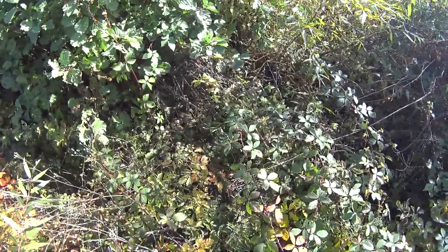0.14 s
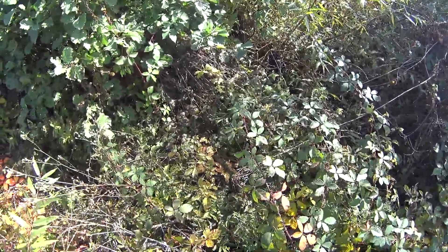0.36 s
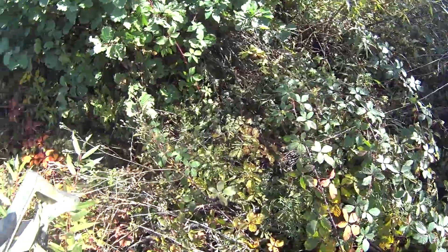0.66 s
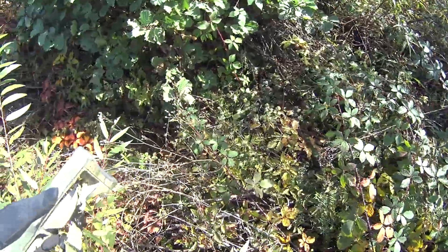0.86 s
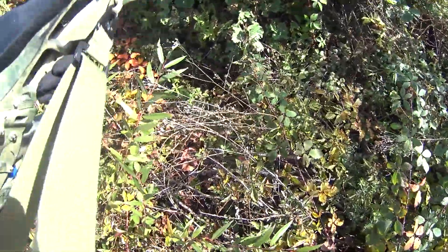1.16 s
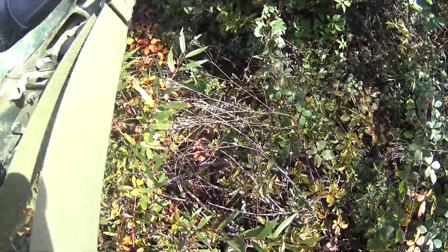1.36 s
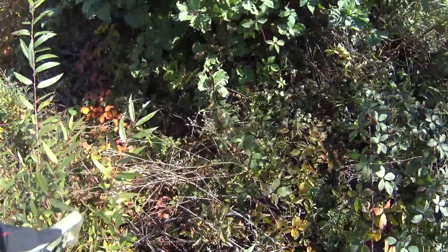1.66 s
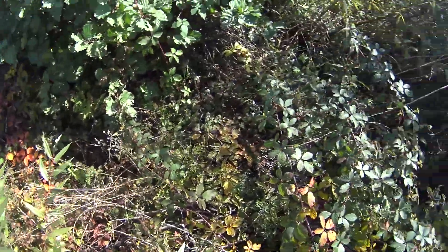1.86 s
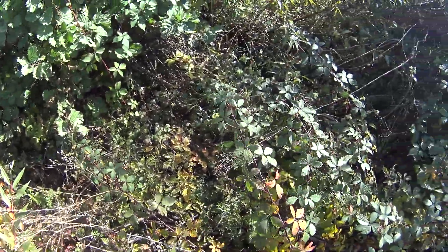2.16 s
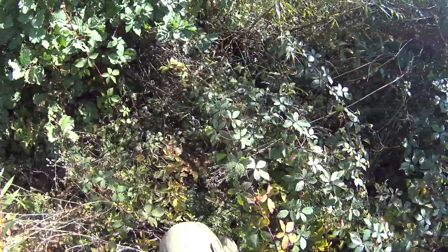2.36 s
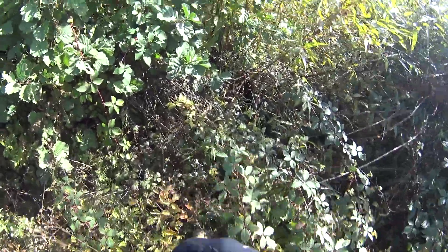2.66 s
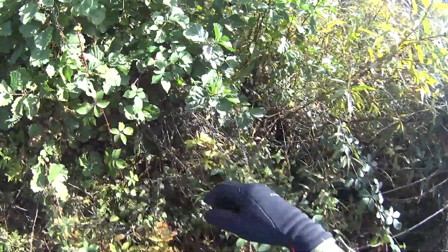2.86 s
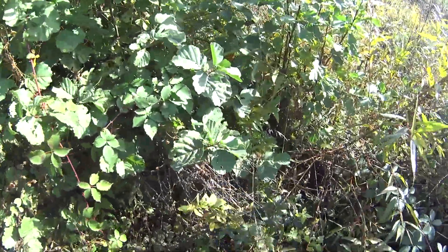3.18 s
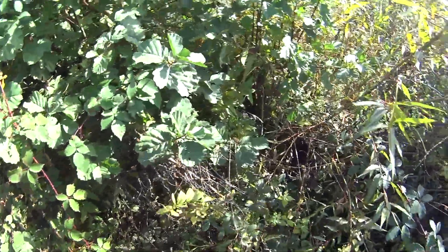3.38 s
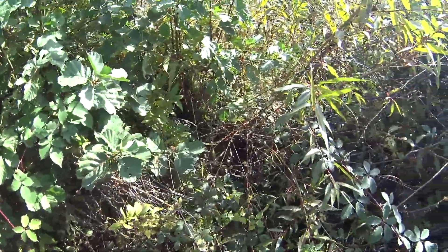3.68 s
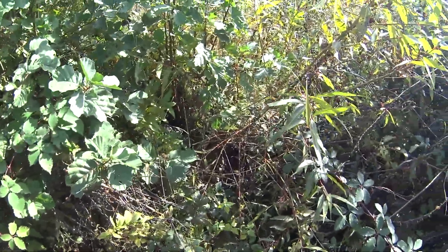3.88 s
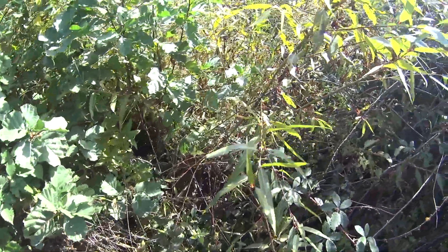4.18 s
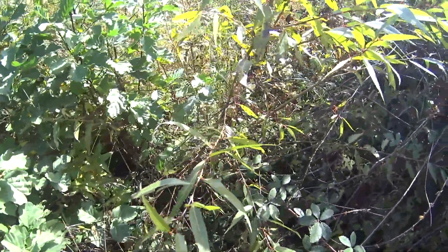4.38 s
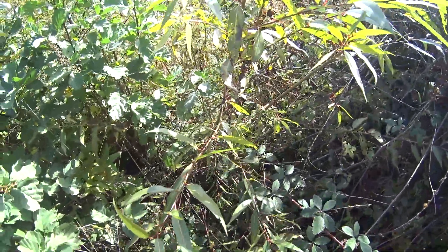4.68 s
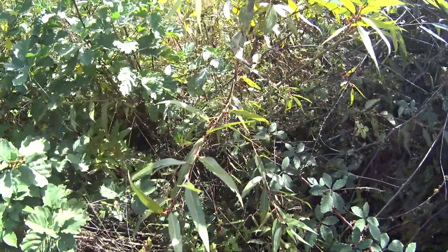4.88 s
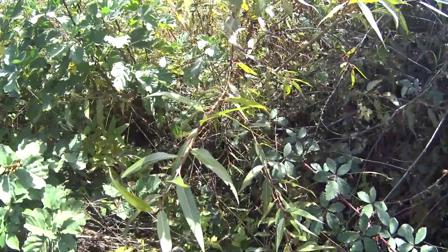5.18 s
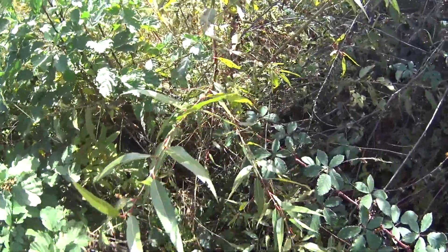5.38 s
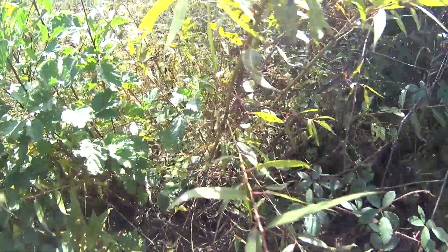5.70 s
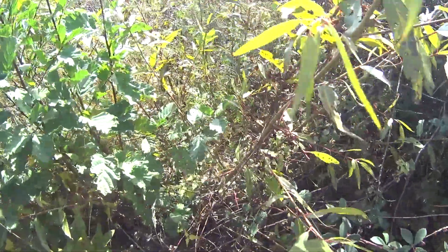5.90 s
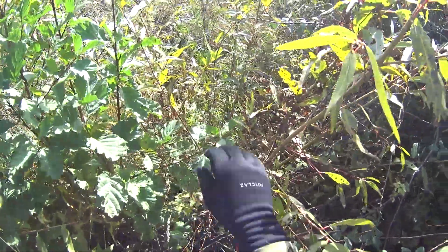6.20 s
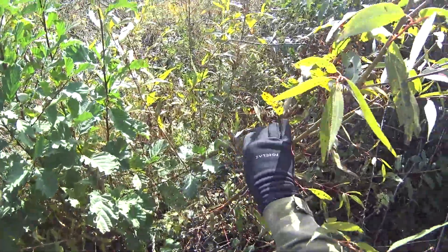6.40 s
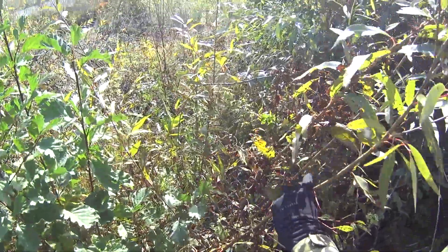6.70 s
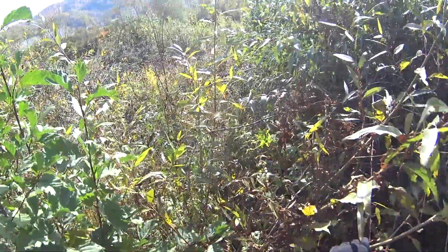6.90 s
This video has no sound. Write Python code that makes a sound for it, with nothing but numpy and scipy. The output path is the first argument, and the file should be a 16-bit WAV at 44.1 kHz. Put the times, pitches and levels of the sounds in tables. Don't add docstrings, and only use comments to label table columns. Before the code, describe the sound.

Someone pushes through dense dry brush; leaves flick and rustle close to the microphone, twigs knock its hard casing, and a low hum swells with jolts.

```python
import sys
import numpy as np
from scipy import signal
from scipy.fft import rfft, irfft, next_fast_len
from scipy.io import wavfile
from scipy.ndimage import uniform_filter1d, map_coordinates

SR = 44100
rng = np.random.default_rng(int(sys.argv[2]) if len(sys.argv) > 2 else 0)


def invert_db(level):
    return 10 ** (np.asarray(level, dtype=float) / 20)


def int16_out(signal):
    q = np.round(np.clip(np.atleast_2d(signal).T, -1, 1) * 32767)
    wavfile.write(sys.argv[1], SR, q.astype(np.int16))


N = 310905


def unit(x):
    return x / np.sqrt(np.mean(x ** 2) + 1e-20)


def along(points, hz):
    f, v = np.transpose(points)
    return np.interp(np.log(hz + 1), np.log(f + 1), v)


def curves(rows):
    s, *columns = np.transpose(rows)
    return [np.interp(np.arange(N) / SR, s, column) for column in columns]


def filtered(x, response):
    size = next_fast_len(x.shape[-1] + 8192)
    spectrum = rfft(x, size) * response(np.fft.rfftfreq(size, 1 / SR))
    return irfft(spectrum, size)[..., :x.shape[-1]]


def hiss(spectrum):
    return unit(filtered(rng.standard_normal(N), lambda hz: invert_db(along(spectrum, hz))))


def contacts(count, spread_db, t60, bed):
    where, size = rng.random((count, 2)).T
    touches = invert_db(-2 * spread_db * np.log(1 - size * .97))
    power = np.bincount((where * N).astype(int), touches, N)
    power = signal.lfilter([1], [1, -invert_db(-120 / (t60 * SR))], power)
    return unit(np.sqrt(power / power.mean() + bed))


def swells(rows, bed_db):
    t = np.arange(0, N, 64) / SR
    peaks = 0
    for s, db, rise, fall in rows:
        distance = np.maximum((s - t) / abs(rise), (t - s) / abs(fall))
        peaks = peaks + invert_db(2 * db - 51.0 * distance)
    return np.sqrt(np.interp(np.arange(N) / SR, t, peaks) + invert_db(2 * bed_db))


# start in seconds, peak in dB, centre in Hz, thin edge in dB.
STEMS = [(0.175, -26, 4600, -35), (0.196, -22, 2590, -38), (0.7795, -21.5, 3560, -37),
         (0.935, -23.5, 2650, -45), (1.046, -21, 2670, -39.5), (1.053, -6.5, 3750, -15),
         (1.7436, -21.5, 3000, -47), (2.6613, -14.5, 3760, 4), (3.557, -21.5, 2850, -42),
         (3.5819, -19, 4750, -43), (4.618, -14.5, 2600, -18), (5.0024, -15.5, 3670, -20),
         (5.7574, -11, 3600, -27), (6.356, -19.5, 2540, -30), (6.46, -6, 2450, -11),
         (6.866, -15, 2860, -32), (4.12, -27, 4000, -40), (0.117, -28.5, 2700, -40), (5.279, -12, 5000, -6)]
# start in seconds, peak in dB, centre in Hz, thin edge in dB.
LEAVES = [(1.006, -26, 7090, -20), (1.488, -5.5, 5200, -30), (2.05, -24, 6070, -27),
          (2.7972, -5.5, 6460, -12), (2.8277, -3, 4440, -26), (3.6657, -22, 5990, -26),
          (3.6773, -11, 5000, -59), (3.7131, -9.5, 5700, -42), (3.8562, -23.5, 5950, -20),
          (3.8677, -22, 5530, -14), (3.978, -22, 4990, -15), (3.989, -17, 6050, -33),
          (4.657, -12.5, 6000, -32), (4.6768, -16, 8320, -26), (5.0431, -13.5, 6010, -21),
          (0.796, -29, 5600, -40), (6.322, -17, 6070, -10), (6.411, -16, 7500, -18),
          (6.712, -23, 6060, -34), (6.734, -20.5, 5980, -38), (6.8267, -18, 5700, -36),
          (6.9098, -12.5, 6000, -5), (6.9508, -18, 5950, -26), (6.417, -17, 7000, -10),
          (6.487, -17.5, 7000, -20), (6.594, -22, 6500, -20), (4.81, -23, 8000, -12),
          (4.83, -24, 8000, -14), (5.022, -15, 6000, -27), (5.09, -18, 4800, -30), (5.157, -25, 4500, -25),
          (0.622, -32, 6000, -23), (0.255, -31, 6500, -20)]
# start in seconds, peak in dB, thin edge in dB, rattle t60 in seconds.
WHIPS = [(2.8745, -9, -17, .035), (2.903, -8, -11, .05), (2.919, -4, -16, 0.067), (2.9638, -4, -17, 0.058),
         (2.9819, -3.5, -35, 0.036), (3.0118, -4.5, -34, 0.039), (3.0206, -6, -27, 0.038),
         (3.0358, -2.5, -35, .035), (3.0577, 0, -11, 0.041), (3.0834, -2, 0, .035),
         (3.0994, -4.5, 14, .035), (5.4746, -12, -11, .02), (5.509, -0.5, -11, .025),
         (5.5753, -1, -39, 0.047), (5.6067, -2.5, -14, .045), (5.627, -3.5, -22, 0.033),
         (5.6623, -4.5, -36.5, 0.063), (5.6677, -12, -21, .04), (5.6823, -9, -18, .03),
         (5.6943, -6, -19, 0.056), (5.708, -1.5, -32, 0.025), (5.7196, -4, -23, 0.044),
         (2.9537, -5, -25, .02), (2.8038, -14, -20, .04), (5.6435, -9, -30, .03), (5.589, -11, -35, .025),
         (5.7415, -14, -35, .03), (3.125, -13, -5, .03)]


def all_flicks():
    stems = [row + (0.054,) for row in STEMS]
    leaves = [row + (0.059,) for row in LEAVES]
    whips = [(s, db, 5170, thin_db, t60) for s, db, thin_db, t60 in WHIPS]
    return stems + leaves + whips


# frequency in Hz, density in dB per Hz.
NEAR = [(710, -81), (1200, -17), (1660, -13.5), (1830, -11.5), (2170, -10.5), (2780, 1), (3300, -6.5),
        (3630, -1), (5130, 1.5), (8140, -1.5), (9200, -11.5), (12000, -12.5), (15700, -10.5)]


def flicks():
    out, noise, t = np.zeros((2, N + SR)), hiss(NEAR), np.arange(SR // 8) / SR
    events = all_flicks()
    sides_db = 1.1 * rng.standard_normal((len(events), 2, 1))
    for (s, db, hz, thin_db, t60), side_db in zip(events, sides_db):
        at = round(s * SR)
        burst = noise[at:][:len(t)]
        decay = invert_db(-60 * t / t60) + 0.44 * np.exp(-(t / 0.0038) ** 4)
        burst = burst * decay[:len(burst)]
        burst[8:11] += 3.75 * np.array([.5, 1, .5])
        centre = lambda f: invert_db(-7 * np.log2((f + 1) / hz) ** 2) + 0.043 * f ** 2 / (f ** 2 + 900 ** 2)
        spray = lambda f: invert_db(thin_db + 14.5) / (1 + (9000 / (f + 1)) ** 8)
        burst = filtered(burst, lambda f: centre(f) + spray(f))
        gain = invert_db(db - 1.2 + side_db - side_db.mean())
        out[:, at:at + len(burst)] += gain * burst / abs(burst).max()
    return out[:, :N]


# frequency in Hz, width in Hz, level in dB.
MOUNT = [(188, 18.2, 8.5), (159, 56.5, -1.5), (259, 69, -8.5), (386, 33, -28)]


def mount(hz):
    modes = 0
    for k, (centre, width, db) in enumerate(MOUNT):
        damping = 1j * hz * width
        modes = modes + (-1) ** k * invert_db(db) * damping / (centre * centre - hz * hz + damping)
    return modes / (1 + 1j * hz / 450) ** 2


SHELL_HZ = [290, 404, 554, 750, 900, 1100, 1430, 1850, 2450, 2700, 3350]
# start in seconds, peak in dB, loudest shell tone in Hz, edge mode in dB, hardness in dB.
KNOCKS = [(0.193, -32.5, 1280, -2, -7), (0.495, -28, 620, -5, -23), (0.771, -13.5, 1143, 2.5, -15),
          (1.05, -21, 497, -2, -5), (1.158, -27, 520, -26, -23), (1.828, -31, 634, -26, -4),
          (2.332, -26.5, 715, -11, -31.5), (2.435, -34, 1350, 5, 0), (2.871, -9, 1464, -1.5, -9.5),
          (2.99, -20, 1460, 4, -26.5), (3.154, -11.5, 467, 0, -10), (3.194, -19, 935, 0, -6),
          (3.362, -7, 874, -2, -5.5), (3.459, -25, 690, -6, -5), (3.763, -29, 1430, 4, -14),
          (3.811, -18.5, 810, 13.5, -4), (4.536, -18, 343, -1.5, -15.5), (5.383, -21.5, 1003, -5, -3),
          (5.417, -23, 402, -18, -25), (5.486, -15, 330, 3, -15), (5.837, -4.5, 954, -7.5, -52),
          (6.193, -33.5, 1410, 2, -13), (6.459, -11, 2630, 3, 2), (6.829, -22, 440, 3, 4),
          (2.8725, -13, 732, 1, -22), (0.773, -18.5, 910, -8, -20), (0.338, -32.5, 700, -2, -7),
          (3.05, -20.5, 326, -9, -20), (3.113, -16, 1880, -3, -17), (3.128, -20, 1050, -2, -15),
          (3.142, -21, 1410, -6, -9), (3.21, -24, 1450, -3, -20), (3.257, -28, 1900, -3, -20),
          (3.327, -27.5, 1840, -5, -12), (3.068, -24, 1800, -3, -4), (6.8309, -26.5, 1200, 2, -6),
          (4.538, -25.5, 1297, -5, -15), (3.418, -32, 764, 2, -4), (0.28, -37, 500, -9, -20),
          (0.598, -37, 560, -9, -20), (5.4855, -17, 1050, 0, -8), (0.176, -30, 4700, -20, -20),
          (3.8125, -23, 880, -9, -20), (3.769, -31, 800, -9, -20)]


def knocks():
    shell, kicks, t = np.zeros(N + SR), np.zeros(N), np.arange(SR // 8) / SR
    grit = hiss([(120, -64), (350, 14.0), (900, 8.0), (1800, -8), (3000, -47)])
    for s, db, hz, edge_db, hard_db in KNOCKS:
        kick_db = min(-13 - 5 * np.log2(hz / 900), -3)
        modes = np.array(SHELL_HZ + [hz])[:, None]
        chance = rng.standard_normal((len(modes), 2))
        level_db = -7 - 4.2 * abs(np.log2(modes / hz)) + 0.57 * chance[:, :1]
        level_db[0] = kick_db + 6.5
        level_db[7] = edge_db + 0.5
        level_db[8:-1] = hard_db + 0.5
        level_db[-1] = 1.5
        level_db[:-1] -= 14 * (abs(np.log2(modes[:-1] / hz)) < 1 / 7)
        age = t / (0.0028 * (900 / modes) ** 0.4)
        touch = (age * np.exp(1 - age)) ** 1.9
        ring_t60 = 0.06 * (900 / modes) ** 0.35
        after = (0.21 + 0.24 * (modes == hz)) * invert_db(-60 * t / ring_t60) * (1 - np.exp(-t / 0.0022))
        tones = np.sin(2 * np.pi * modes * t + 0.76 * chance[:, 1:])
        ring = (invert_db(level_db) * (touch + after) * tones).sum(axis=0)
        debris = min(900 / hz, 1) ** 2 * invert_db(-20.5 - 60 * t / 0.11) * grit[round(s * SR):][:len(t)]
        shell[round((s - .0018) * SR):][:len(t)] += invert_db(db + 2.0) * (ring / abs(ring).max() + debris)
        kicks[round(s * SR)] = invert_db(db + kick_db + 40)
    radiated = filtered(shell[:N], lambda f: (1j * f / (200 + 1j * f)) ** 2)
    return radiated + filtered(kicks, mount)


# peak in seconds, hum in dB, fall in seconds, deep rumble in dB over the hum.
JOLTS = [(0.041, -24, 0.08, -13), (0.51, -29, 0.25, -19), (0.721, -19.5, 0.15, -8.5),
         (0.9, -22.5, 0.3, -15), (0.995, -27, 0.02, -19), (1.178, -33.5, -1.5, -24),
         (1.312, -31.5, 0.07, -8.5), (1.599, -29.5, 0.5, -24.5), (1.649, -21, 0.14, -14),
         (1.74, -22, 0.11, -7.5), (1.849, -27, 0, -15), (2.501, -38, -1.5, -5.5), (2.59, -37.5, .3, -20),
         (2.879, -28.5, 0.16, -6), (3.119, -12.5, 0.2153, -12), (3.161, -10, 0.06, -6),
         (3.336, -22, 0.06, -11), (3.38, -27, -0.06, -24), (3.471, -38.5, 0.76, -13),
         (4.719, -40, 1.3, -13), (4.891, -30.5, 0.3, -7), (5.098, -27.5, 0.4, -17), (5.421, -36, -3, -15),
         (5.502, -36, 0.84, -16), (5.561, -37, 0.2, -10), (5.771, -34, 0.47, -7), (5.85, -30.5, 0.3, -10.5),
         (6.048, -31, 0.22, -14), (6.3, -47, .2, -6), (6.486, -34, -0.07, -27), (.17, -44, -0.5, -18),
         (.222, -38, 0, -13), (.35, -35, .12, -15), (.572, -33.5, 0.4, -10), (1.41, -40, -0.16, -13),
         (2.19, -45.5, 0.8, -19), (2.752, -35, -0.3, -13), (2.951, -31, -0.05, -14),
         (3.057, -26.5, .1, -12), (3.088, -28, .1, -12), (3.195, -17.5, 0.11, -11), (3.229, -26, 0.14, -12),
         (3.27, -27, 0.11, -12), (3.545, -41, 0.2, -12), (3.7, -43, .3, -12), (4.078, -39, 0.1, -14),
         (5.015, -40, 1, -12), (5.155, -29, .15, -16), (5.704, -39, .2, -10), (6.433, -42, .15, -14)]
# time in seconds, hum in dB.
UNREST = [(0.0, -36.5), (0.45, -40.5), (1.5, -48.5), (1.92, -58), (2.2, -45), (3.57, -56), (3.8, -47),
          (4.2, -46.5), (4.5, -59), (4.8, -41.5), (6.3, -48), (6.54, -63), (7.05, -66)]
# frequency in Hz, density in dB per Hz.
DEEP = [(20, 2), (48, -9), (78, 14.5), (100, 3), (125, 5), (150, -33)]


def shaking():
    unrest_db, = curves(UNREST)
    force = rng.standard_normal(N) * contacts(count=160, spread_db=1.2, t60=0.049, bed=0.45)
    hum = unit(filtered(force, mount))
    hum = unit(hum / (np.abs(uniform_filter1d(hum ** 2, size=1400)) + 0.1) ** 0.28)
    rise_s = 0.069
    jolts = swells([(s, db, rise_s, fall) for s, db, fall, _ in JOLTS], unrest_db)
    sway = swells([(s, db + deep_db, rise_s, fall) for s, db, fall, deep_db in JOLTS], unrest_db - 11)
    blows = np.zeros(N)
    for s, db, *_ in JOLTS:
        blows[round((s - 0.01255) * SR)] = invert_db(db + 37)
    return filtered(blows, mount) + invert_db(-3.5) * (jolts * hum + sway * hiss(DEEP))


# start in seconds, hold in seconds, level in dB.
RIPS = [
    (2.68, 0.014, -14.5),
    (2.705, 0.013, -15.5),
]
# frequency in Hz, density in dB per Hz.
RIP = [(410, -57), (700, -27), (1260, -22.5), (1470, -14), (3340, -4.5), (3560, -4.5), (8080, -14),
       (10100, -27), (15700, -25)]
# middle in seconds, half length in seconds, centre in Hz, level in dB.
SWISHES = [
    (0.403, 0.13, 3480, -46),
    (1.297, 0.18, 4100, -38),
    (4.434, 0.034, 1550, -41.5),
    (4.659, 0.02, 1610, -37.5),
    (5.888, 0.018, 885, -36.5),
]


def sleeve():
    t, out = np.arange(N) / SR, np.zeros(N)
    rough = hiss(RIP) * contacts(count=2500, spread_db=5.5, t60=0.014, bed=2.2)
    for s, hold, db in RIPS:
        decay_db = -60 * np.clip(t - s - hold, 0, 1) / 0.052
        out += invert_db(db + decay_db) * (t > s) * rough
    for s, half, hz, db in SWISHES:
        colour = [(20, -90), (hz / 2.6, -18), (hz, 0), (hz * 2.0, -18), (hz * 4, -80)]
        out += invert_db(db) * np.exp(-((t - s) / half) ** 2) * hiss(colour)
    return out


# start in seconds, gap in seconds, number of ticks, peak in dB.
RATCHETS = [
    (2.339, .0053, 3, -26.5),
    (2.4344, .0046, 6, -23.5),
]


def ratchets():
    ticks = np.zeros(N)
    for s, gap, count, db in RATCHETS:
        k = np.arange(int(count))
        at = np.round((s + gap * k) * SR).astype(int)
        ticks[at] = invert_db(db + 1.3 * rng.standard_normal(len(k)))
    rattle = signal.lfilter([1], [1, -invert_db(-60 / (0.0097 * SR))], ticks)
    return rattle * hiss([(600, -40), (1500, 3), (8000, -3.0), (15700, -25)])


def dip():
    starts_s = np.array([row[0] for row in all_flicks() + RIPS])
    starts = np.bincount(np.round(starts_s * SR).astype(int), minlength=N)
    ramp = np.exp(-np.arange(400) / (0.00071 * SR))
    depth = signal.fftconvolve(starts[::-1], ramp)[:N][::-1]
    return 1 - np.clip(1.4 * depth, 0, .9)


# peak in seconds, level in dB, rise in seconds, fall in seconds.
BRUSHES = [(1.057, -47, 0.088, 0.12), (1.49, -44, 0.041, 0.19), (2.07, -47, 0.1, 0.4),
           (5.93, -47, 0.87, 0.017), (2.708, -39.5, 0.27, 0.11), (2.9, -32, 0.15, 0.54),
           (3.07, -30.5, .5, 0.18), (3.46, -44.5, 0.13, .15), (3.72, -46, 0.43, 0.14),
           (4.29, -51, 0.074, 2.4), (4.67, -46, 0.17, 0.32), (5.206, -43.5, 1, 1.6),
           (5.48, -31, 0.41, 0.39), (5.71, -35, 0.6, 0.3), (5.38, -35, 0.31, 0.45),
           (4.41, -48.5, 0.14, 0.23), (0.325, -57, 0.074, 0.16), (0.054, -52.5, .05, 0.057),
           (6.48, -43, 0.79, 0.31), (6.83, -46, 0.12, 0.97), (7.05, -41.5, 0.46, .3)]
# time in seconds, gain in dB.
DRYNESS = [(0, 0), (.7, -4), (1.2, -0.5), (2, 0.1), (2.6, 0.1), (3.3, -.9), (4.2, 0.1), (4.6, 3),
           (5.2, 0.7), (5.8, 0.5), (6.2, 1.5), (6.55, 4), (6.7, -1), (7.05, 2)]
# time in seconds, level in dB.
PUSH = [(0.0, -36.5), (0.96, -49), (1.14, -39.5), (2.06, -33), (2.4, -44.5), (2.71, -29), (3.08, -47.5),
        (3.3, -42), (3.75, -34.5), (4.0, -53), (4.24, -37.5), (4.46, -34), (4.6, -40), (5.71, -39),
        (5.95, -45.5), (6.44, -34), (6.68, -42),        (7.05, -37)]
# frequency in Hz, density in dB per Hz.
FAR = [(1060, -37), (1800, -20), (2340, -13), (2680, 2.5), (3130, -2.5), (4620, -6.5), (5440, -10),
       (6010, -6.5), (7470, -22), (9890, -61), (15700, -69)]
# peak in seconds, level in dB, rise in seconds, fall in seconds.
DRAGS = [(0.05, -46, 1.8, 4.2), (1.2, -48.5, 2.1, 2.4), (3.6, -46.5, 7.3, 0.77), (4.7, -44.5, 1.7, 2.4),
         (1.9, -44, 1.2, 1.36), (3.08, -27.5, 0.084, 0.18), (3.17, -34, 0.51, 0.37),
         (5.48, -38.5, 0.32, 0.36), (5.71, -38, 0.083, 0.56), (5.9, -41, 0.55, 0.065),
         (3.25, -40, .1, 0.055), (6.45, -42, 0.71, 0.4), (7.0, -44.5, 0.84, 0.75)]
# frequency in Hz, density in dB per Hz.
SCRAPE = [(190, -6.5), (330, -7.5), (424, -3), (478, -5), (642, -11.5), (724, -8.5), (1030, -5),
          (1170, -5.5), (1890, -2), (2100, -1.5), (2600, 0), (3380, -5.5), (5720, -120)]


def foliage():
    far_db, = curves(PUSH)
    dry_db, = curves(DRYNESS)
    leaves = hiss(NEAR)
    fizz = filtered(leaves, lambda hz: 1 / (1 + (9200 / (hz + 1)) ** 12))
    crackle = contacts(count=1400, spread_db=2.0, t60=0.017, bed=2.0)
    near = invert_db(12) * swells(BRUSHES, -62.5) * (leaves + (invert_db(dry_db) - 1) * fizz) * crackle
    far = invert_db(far_db - 5.0) * hiss(FAR) * contacts(count=700, spread_db=3.5, t60=0.046, bed=1.0)
    ringing = lambda hz: 0.59 + sum(70 / np.hypot(70, hz - mode) for mode in SHELL_HZ[2:8])
    scrape = unit(filtered(hiss(SCRAPE), ringing))
    scrape = scrape * contacts(count=400, spread_db=1.0, t60=0.12, bed=0.85)
    return dip() * (near + far * invert_db([[.8], [-.8]]) + swells(DRAGS, -53.5) * scrape)


# frequency in Hz, left minus right in dB.
LEAN = [(30, 1), (70, -2), (180, -3.5), (320, -4.5), (500, 0), (1200, -3), (3000, 1.5), (9000, 0.3)]
# frequency in Hz, level in dB.
APART = [(60, -48), (300, -12), (600, -4), (1200, -9), (3000, -13), (6000, -12), (12000, -25.5)]


def scene():
    brush = foliage() + flicks() + sleeve()
    blows = knocks()
    brush = brush + shaking()
    wander = unit(map_coordinates(rng.standard_normal(N // 800 + 4), [np.arange(N) / 800]))
    delayed = np.roll(brush.mean(axis=0), 9)
    loose = filtered(delayed * wander, lambda hz: invert_db(along(APART, hz)))
    ports = brush + blows + [loose, -loose] + ratchets()
    return filtered(ports, lambda hz: invert_db(along(LEAN, hz) * [[.5], [-.5]]))


def low_pass(x):
    return signal.sosfilt(signal.butter(12, 16990, fs=SR, output="sos"), x)


# frequency in Hz, gain in dB.
PORT = [(9000, 0), (10050, -4.5), (11000, 2.5), (12050, -7), (12700, -2.5), (13500, -4), (15200, 2.5),
        (15700, -1), (15840, -9)]


def record(dry):
    port = lambda hz: invert_db(along(PORT, hz) - 55 * (hz > 15850))
    rounded = dry / (1 + abs(dry / .85) ** 4) ** (1 / 4)
    return low_pass(filtered(rounded, port))


dry = scene()
out = record(dry)
int16_out(out)
```